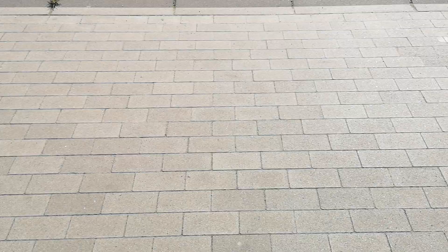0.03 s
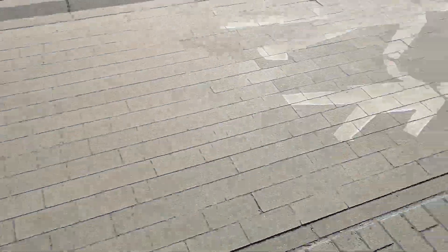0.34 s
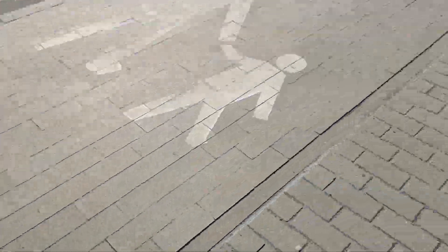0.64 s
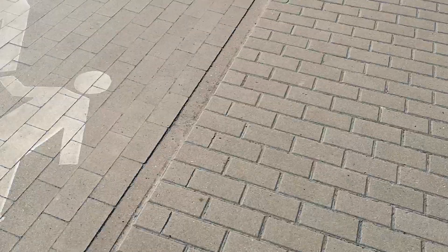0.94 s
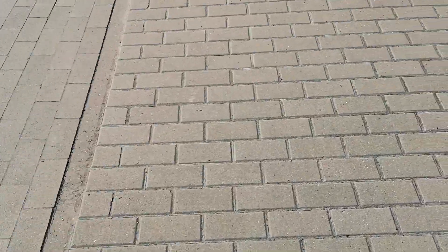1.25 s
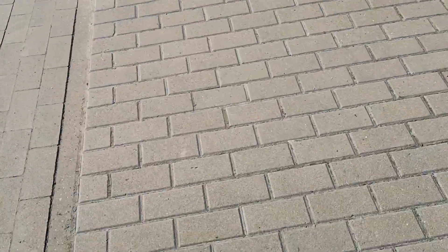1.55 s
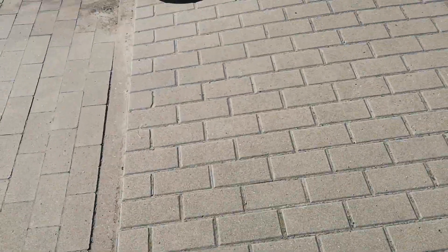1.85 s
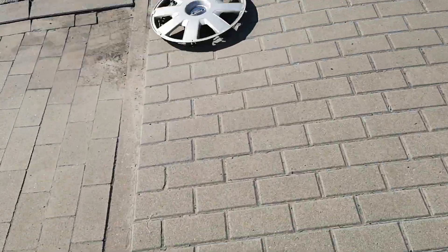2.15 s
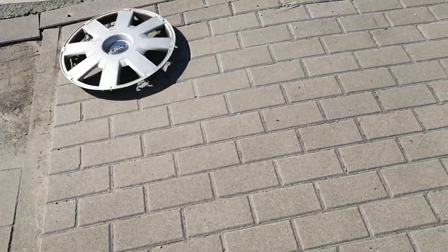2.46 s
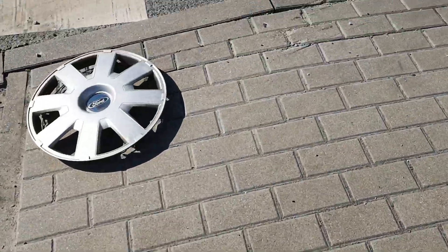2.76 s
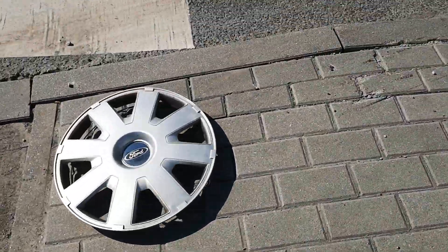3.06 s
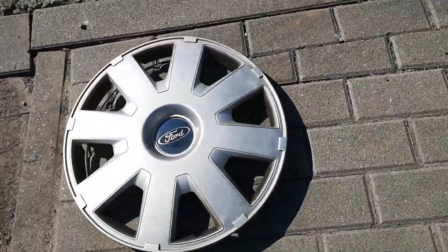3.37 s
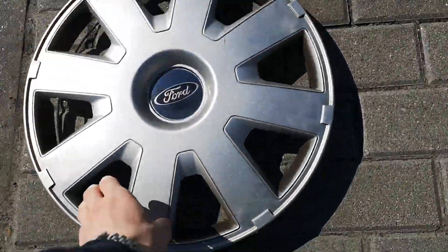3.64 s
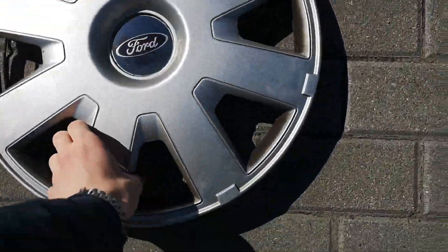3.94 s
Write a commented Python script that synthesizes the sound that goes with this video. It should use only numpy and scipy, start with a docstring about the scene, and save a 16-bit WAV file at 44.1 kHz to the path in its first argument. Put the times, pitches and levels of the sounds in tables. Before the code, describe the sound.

Tyres of passing cars roar and hiss steadily, with light wind rumbling on the microphone.

```python
"""Tyres of passing cars roar and hiss on a road, heard from a phone that is carried along and turned.
Their direct sound reaches the right microphone port after the left, shaded by the phone's body,
while the street scatters more in from all sides. Light wind rumbles, flutters and thumps on the ports.
Near the end a jacket sleeve rustles, cloth sliding on cloth. The sound cuts in after a short silence."""
import sys
import numpy as np
from scipy import signal
from scipy.fft import rfft, irfft
from scipy.io import wavfile
from scipy.ndimage import uniform_filter1d

SR = 44100
rng = np.random.default_rng(int(sys.argv[2]) if len(sys.argv) > 2 else 0)


def generate_wav(signal):
    """Clip the signal to [-1, 1] and save it as 16-bit WAV at the path in sys.argv[1]."""
    frames = np.transpose(np.atleast_2d(signal))
    scaled = np.clip(frames, -1, 1) * 32767
    pcm = np.round(scaled).astype(np.int16)
    wavfile.write(sys.argv[1], SR, pcm)


N = 176400
TIME = np.arange(N) / SR


def undb(db):
    """Amplitude ratio of a level in decibels."""
    return 10 ** (np.asarray(db) / 20)


def curve(table, t, column=1):
    """Linear interpolation of a table column over time."""
    rows = np.array(table)
    return np.interp(t, rows[:, 0], rows[:, column])


def colour(table, hz, column=1):
    """Linear interpolation of a table column over log frequency."""
    rows = np.array(table)
    return np.interp(np.log(hz + 1), np.log(rows[:, 0]), rows[:, column])


def rise(hz, low_hz, high_hz):
    """Crossover from 0 to 1 over log frequency."""
    return np.clip(np.log((hz + 1) / low_hz) / np.log(high_hz / low_hz), 0, 1)


def bell(x, centre, width):
    """Gaussian of height 1, falling to 1/e at one width from its centre."""
    return np.exp(-((x - centre) / width) ** 2)


def band(hz, centre_hz, octaves):
    """Gaussian band over log frequency."""
    return bell(np.log2(hz + 1), np.log2(centre_hz), octaves)


def moving_band(table, t, hz, octaves):
    """Spectral peak of gliding centre and height, in dB."""
    return curve(table, t, column=2) * band(hz, curve(table, t), octaves)


def wander(rate_hz):
    """Random modulation: held steps, smoothed twice, with standard deviation 1."""
    hold = max(int(SR / rate_hz), 2)
    steps = np.repeat(rng.standard_normal(N // hold + 1), hold)
    path = uniform_filter1d(uniform_filter1d(steps, hold), hold)[:N]
    return path / path.std()


def pan(db):
    """Port gains for a level difference, left minus right."""
    return undb(np.array([[db], [-db]]) / 2)


def stereo_noise(spectrum, incoherence):
    """Partly coherent noise of rms 1; incoherence is the share of power that is each port's own."""
    hz = np.arange(N // 2 + 1) * SR / N
    rolloff = 1 / np.maximum(hz / spectrum[-1][0], 1) ** 2
    noise = irfft(rfft(rng.standard_normal((3, N))) * undb(colour(spectrum, hz)) * rolloff, N)
    noise = noise / noise.std(axis=1, keepdims=True)
    own = np.clip(incoherence, 0, 1)
    return np.sqrt(1 - own) * noise[0] + np.sqrt(own) * noise[1:]


def steadied(noise, seconds):
    """Division by the running rms evens out slow swings of level."""
    return noise / np.sqrt(uniform_filter1d(np.mean(noise ** 2, axis=0), int(seconds * SR)))


# Envelope of the rustle (time [s], level [dB])
SLEEVE_ENVELOPE = [(3.2, -74), (3.42, -57.5), (3.54, -57), (3.8, -57), (3.86, -59.5), (3.92, -69)]
# Spectrum of the rustle (frequency [Hz], relative density [dB])
SLEEVE_SPECTRUM = [(1500, -18), (4000, 3.5), (7500, 3), (9000, -4.5), (12000, -7), (15000, -11)]


def sleeve():
    """Stick-slip friction: cloth slides on cloth in small uneven catches."""
    catches_db = 1.5 * (wander(400) + wander(38)) / np.sqrt(2)
    fade_in = np.clip((TIME - SLEEVE_ENVELOPE[0][0]) * 20, 0, 1)
    envelope = fade_in * undb(curve(SLEEVE_ENVELOPE, TIME) + catches_db)
    return stereo_noise(SLEEVE_SPECTRUM, incoherence=1) * envelope * pan(db=-6.5)


# Spectra of the wind pressure (frequency [Hz], relative density [dB])
RUMBLE_SPECTRUM = [(12, -11.5), (25, 0), (40, -3), (57, 1), (80, -5.5), (110, -8), (150, -15.5), (300, -46)]
FLUTTER_SPECTRUM = [(70, -38), (120, 5), (160, 0.5), (200, -1.5), (260, -8), (330, -14.5), (450, -42.5),
                    (900, -63)]
# Envelopes of the wind pressure (time [s], relative level [dB])
RUMBLE_ENVELOPE = [(.45, -25), (.65, -18), (.72, -22.5), (1, -20.5), (1.26, -16), (1.36, -21), (1.6, -20),
                   (1.88, -20.5), (2.02, -14.5), (2.2, -18.5), (2.45, -23), (2.72, -24.5), (2.86, -20.5),
                   (3.1, -21), (3.25, -21.5), (3.5, -22.5), (3.63, -15), (3.75, -30), (3.82, -22),
                   (3.9, -23.5), (4, -14.5)]
FLUTTER_ENVELOPE = [(.45, -34), (.75, -35.5), (.98, -25.5), (1.25, -27.5), (1.36, -27), (1.6, -34),
                    (1.72, -27.5), (1.82, -31.5), (2.02, -25), (2.22, -29.5), (2.45, -32), (2.8, -35.5),
                    (2.95, -33), (3.13, -29.5), (3.28, -36), (3.5, -28.5), (3.64, -37), (3.75, -34.5),
                    (3.95, -34.5)]


def wind():
    """Turbulent pressure: the deep rumble is nearly coherent at the ports, the higher flutter less so."""
    rumble = steadied(stereo_noise(RUMBLE_SPECTRUM, incoherence=0.039), seconds=0.12)
    rumble_db = curve(RUMBLE_ENVELOPE, TIME) + 1.5 + 2 * wander(20)
    flutter = steadied(stereo_noise(FLUTTER_SPECTRUM, incoherence=0.58), seconds=0.063)
    flutter_db = curve(FLUTTER_ENVELOPE, TIME) + 2 + 3.5 * wander(40)
    return rumble * undb(rumble_db) + flutter * undb(flutter_db)


# Single eddies (time [s], half-width [s], level [dB], left minus right [dB], centre [Hz])
EDDIES = [(0.903, 0.022, -13, -4.5, 120), (1.233, 0.047, -25, -5, 99), (1.506, 0.012, -21.5, -4.5, 265),
          (1.549, 0.0085, -22, -3.5, 266), (1.833, 0.011, -18, -7, 236), (1.942, 0.027, -19, 4, 141),
          (2.116, .022, -18, -5.5, 213), (3.075, 0.048, -22, 5.5, 196), (3.319, 0.015, -10, 0, 41),
          (3.551, 0.017, -15, 4, 210), (3.631, 0.019, -17, -4.5, 130), (3.995, 0.012, -17.5, 4, 277)]
# Spectrum of an eddy (frequency / centre [ratio], relative density [dB])
EDDY_SPECTRUM = [(.2, 1.5), (.55, -6.5), (1, -3), (1.5, -6.5), (2.1, -20.5), (3.2, -33.5), (7, -58),
                 (18, -73)]


def buffets():
    """Eddy scale sets the thump: smaller eddies sound higher and are less coherent between the ports."""
    thumps = 0
    for at, width_s, db, side_db, centre_hz in EDDIES:
        spectrum = [(ratio * centre_hz, level) for ratio, level in EDDY_SPECTRUM]
        noise = stereo_noise(spectrum, incoherence=0.94 * centre_hz / 224)
        thumps = thumps + undb(db) * pan(side_db) * bell(TIME, at, width_s) * steadied(noise, width_s)
    return thumps


# Exposure of the right port (time [s], upper-mid gain [dB], treble gain [dB])
PORT_EXPOSURE = [(.45, -6.5, -1), (.55, -11, -9), (.68, 0.7, 10), (.8, 5, 14.5), (1, 5.5, 15),
                 (1.25, 4.5, 4.5), (1.5, 2, 4.5), (1.7, 4.5, 4), (1.86, -4, -1), (2, -10, -3),
                 (2.3, -6, 3.5), (2.45, -5.5, -2), (2.75, -5, -5), (3, -0.5, -3.5), (3.25, 3, -2.5),
                 (3.6, -1, -4), (3.8, 5.5, -8), (4, 0.5, 3.5)]
# Notch cast by the phone's body (time [s], centre [Hz], depth [dB])
BODY_NOTCH = [(1, 5160, 7), (1.3, 5740, 6), (1.65, 6950, 2.5), (1.9, 7000, 5.5), (2.6, 3700, 4.5),
              (2.85, 3640, 14), (3.25, 3080, 7.5), (3.5, 3000, 1.5)]


def body_shadow(t, hz):
    """Acoustic shadowing: the turning phone shades or exposes its right port to short waves, in dB."""
    treble = rise(hz, 3450, 5100)
    facing_db = (1 - treble) * curve(PORT_EXPOSURE, t) + treble * curve(PORT_EXPOSURE, t, column=2)
    top_taper = 1 - 0.79 * rise(hz, 8000, 11000)
    return rise(hz, 900, 2000) * facing_db * top_taper - moving_band(BODY_NOTCH, t, hz, octaves=0.35)


# Path delay set by the bearing of the traffic (time [s], lag of the right port [ms])
ARRIVAL_LAG = [(0.45, 0.485), (0.85, 0.38), (1.1, 0.32), (1.35, 0.285), (1.52, 0.29), (1.8, 0.42),
               (1.98, 0.52), (2.1, 0.541), (2.75, 0.524), (2.92, 0.4), (3.2, 0.33), (3.55, 0.31), (4, 0.12)]
# Sound scattered by the street (time [s], share of the power at low frequencies [0-1])
DIFFUSE_SHARE = [(.45, 0.14), (1.3, 0.34), (1.75, 0.29), (2.4, 0.15), (3.1, 0.37), (3.7, 0.6)]


def street_field(noise, t, hz):
    """Superposition of a direct wave, late at the right port, and a diffuse field that rules the top."""
    scatter_hz, widening_hz, widening_s = 8600, 702, 0.00045
    direct_share = np.clip(1 - curve(DIFFUSE_SHARE, t), 0, 1) / (1 + (hz / scatter_hz) ** 3)
    direct = np.sqrt(direct_share) * noise[0]
    diffuse = np.sqrt(1 - direct_share) * noise[1:]
    # Stereo widening: extra right-channel delay below about 700 Hz spreads the low roar.
    lag_s = curve(ARRIVAL_LAG, t) / 1000 + widening_s / (1 + (hz / widening_hz) ** 6)
    return direct + diffuse[0], direct * np.exp(-2j * np.pi * hz * lag_s) + diffuse[1]


# Envelope of the passing tyres (time [s], roar gain [dB], hiss gain [dB])
TYRE_ENVELOPE = [(.45, 6.5, 4), (.55, 1.3, 4.5), (.68, 0, 1), (.8, -0.3, 1), (1, 1.9, 1.5),
                 (1.25, 1.5, -0.5), (1.5, 2.1, 3), (1.7, 4, 4), (1.86, 5, 4.5), (2, 4.5, 3.5),
                 (2.3, 1.5, 1.6), (2.45, 0.5, -0.3), (2.75, 1.5, 2), (3, -0.5, -1.6), (3.25, -2.5, -5),
                 (3.6, -7.5, -12), (3.8, -6.5, -10.5), (4, -8.6, -15)]
# Gliding resonance that colours the road noise (time [s], centre [Hz], gain [dB])
GLIDING_PEAK = [(.45, 1843, 4.5), (.62, 1950, 4), (.9, 2220, 0), (1.2, 2320, 1), (1.6, 2600, -2),
                (1.85, 1910, 0.5), (2.05, 1460, 9.5), (2.3, 1440, 5.5), (2.45, 1850, -2.5),
                (2.6, 1970, 5.5), (2.85, 1900, 2.5), (3.1, 1820, 10), (3.45, 1900, 8), (3.65, 1900, 8),
                (4, 1850, 10)]
# Thin tyre whine (time [s], centre [Hz], gain [dB])
WHINE_BAND = [(.45, 1700, 15), (.56, 1720, 5), (.68, 1880, -6), (2.5, 1930, 6.5), (2.62, 1910, -1.5),
              (2.92, 1990, 2.5), (3.07, 1970, 4.5), (3.28, 1960, -8), (3.45, 2060, 6), (3.62, 1940, -14)]


def tyres(t, hz):
    """Rolling noise: broadband roar and hiss, coloured by gliding peaks, as a gain in dB."""
    hiss = rise(hz, 1220, 2200)
    db = (1 - hiss) * curve(TYRE_ENVELOPE, t) + hiss * curve(TYRE_ENVELOPE, t, column=2)
    swell_db, flicker_db = 0.61, 1.14
    db += swell_db * np.interp(t, TIME, wander(8.97))
    for centre_hz in np.geomspace(500, 8000, 9):  # each half octave flickers on its own
        triangle = np.maximum(1 - 2 * abs(np.log2((hz + 1) / centre_hz)), 0)
        db += flicker_db * triangle * np.interp(t, TIME, wander(21.89))
    db += moving_band(GLIDING_PEAK, t, hz, octaves=0.19)
    db += moving_band(WHINE_BAND, t, hz, octaves=0.06)
    db += 9 * bell(t, 2.04, 0.29) * band(hz, 840, octaves=0.19)  # hollow roar of the nearest car
    db += 13 * bell(t, 1.33, 0.35) * band(hz, 10500, octaves=0.55)  # sizzle of the closest tyres
    return db


# Base spectrum of the road noise (frequency [Hz], left density [dB/Hz], right density [dB/Hz])
ROAD_SPECTRUM = [(473, -69.5, -70), (710, -68.5, -77), (890, -66, -70), (986, -62.5, -69),
                 (1260, -67.5, -68.5), (1620, -68, -70.5), (2260, -67, -67), (2700, -71, -68.5),
                 (3160, -80, -75.5), (3810, -78.5, -77.5), (4200, -83.5, -81.5), (6340, -85.5, -88.5),
                 (7470, -84, -91), (8100, -92.5, -98.5), (10500, -110, -107), (15000, -112, -112)]


def traffic():
    """Source and filter: tyre noise crosses the street and passes the phone's body to the two ports."""
    frames = dict(fs=SR, nperseg=512, noverlap=384)
    hz, t, noise = signal.stft(rng.standard_normal((3, N)), **frames)
    hz = hz[:, None]
    tyre_db = tyres(t, hz)
    left, right = street_field(noise, t, hz)
    left *= undb(tyre_db + colour(ROAD_SPECTRUM, hz))
    right *= undb(tyre_db + colour(ROAD_SPECTRUM, hz, column=2) + body_shadow(t, hz))
    _, ports = signal.istft(np.array([left, right]), **frames)
    return np.sqrt(SR / 2) * ports[:, :N]  # scales the white noise to unit power per hertz


def scene():
    """Superposition: the pressures of traffic, wind and sleeve add at each port."""
    return traffic() + wind() + buffets() + sleeve()


def record(dry):
    """Gating and band limiting: the phone starts abruptly and cuts the very bottom and the top."""
    start_s, ramp_s, low_hz, top_hz = 0.4392, 0.0012, 12, 15200
    gate = np.clip((TIME - start_s) / ramp_s, 0, 1)
    highpass = signal.butter(2, low_hz, "highpass", fs=SR, output="sos")
    lowpass = signal.ellip(10, 0.1, 80, top_hz, fs=SR, output="sos")
    return signal.sosfilt(lowpass, signal.sosfilt(highpass, dry) * gate)


dry = scene()
out = record(dry)
generate_wav(out)
```